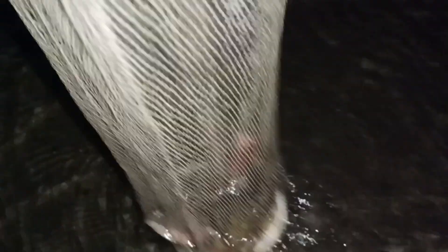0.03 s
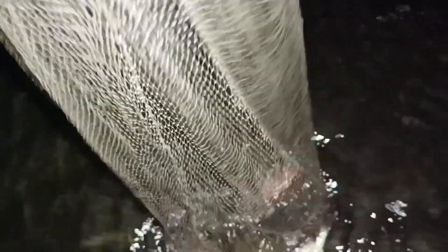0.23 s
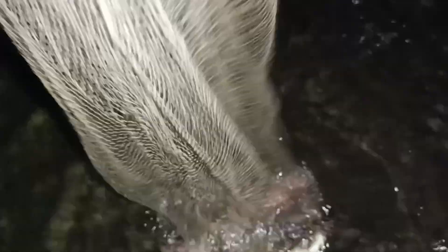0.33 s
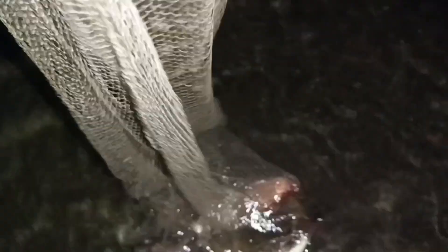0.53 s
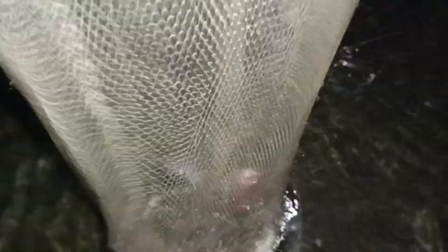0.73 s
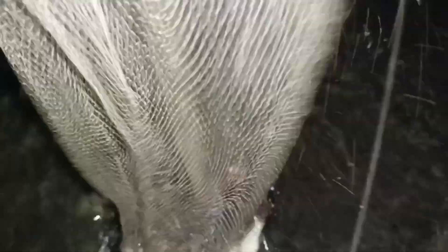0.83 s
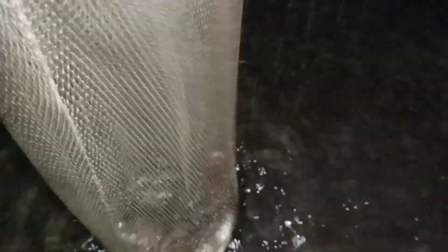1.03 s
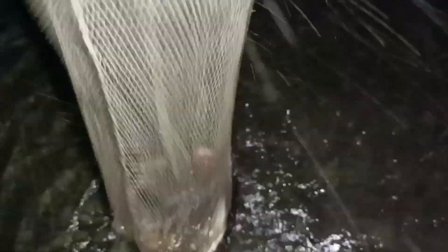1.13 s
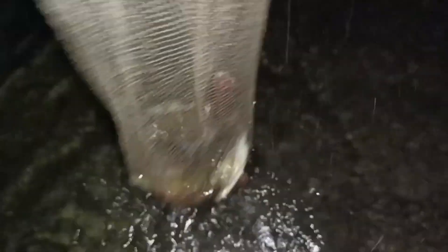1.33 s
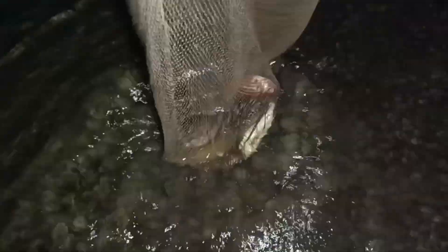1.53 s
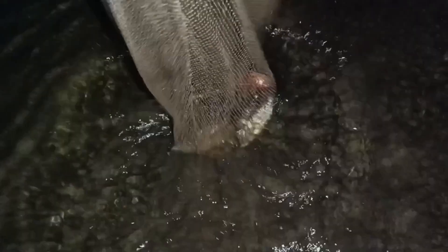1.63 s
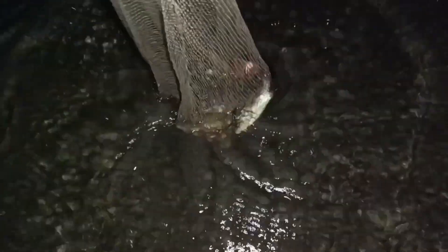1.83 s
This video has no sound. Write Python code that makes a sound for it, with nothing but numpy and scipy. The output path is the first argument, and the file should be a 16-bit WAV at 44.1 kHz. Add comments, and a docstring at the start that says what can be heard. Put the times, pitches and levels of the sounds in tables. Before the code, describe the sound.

A net sweeps through shallow water in one bubbling, splashing surge, then drips as water settles

```python
"""A mesh net is swept through shallow water, close by and a little to the right.
One surge swells and drains: decaying sine bubbles by the hundred over a wash of band-passed noise.
Large bubbles plop, as single rising sines, and drops add a tick of noise to a short ring.
Then the net is lifted; it plops and drips while the churned water, softer bubbles and foam, keeps
lapping and fizzing. A short scatter of decaying noise follows each plop and drip."""
import sys
import numpy as np
from scipy import signal
from scipy.io import wavfile

SR = 44100
rng = np.random.default_rng(int(sys.argv[2]) if len(sys.argv) > 2 else 0)


def unload_wav(signal):
    """Save mono or channel-first audio to the path in sys.argv[1] as 16-bit WAV at rate SR, clipped to [-1, 1]."""
    wavfile.write(
        sys.argv[1],
        SR,
        np.round(np.clip(np.atleast_2d(signal).T, -1, 1) * 32767).astype(np.int16),
    )


N = 83790
TIME = np.arange(N) / SR
LEFT_LAG_S = 0.00028  # sound from the right reaches the left microphone later


def from_db(db):
    """Decibels are logarithmic: an amplitude ratio of ten is 20 dB."""
    return 10 ** (np.asarray(db) / 20)


def rms_one(x):
    """Power is the mean square: scale it to one."""
    return x / np.sqrt(np.mean(x ** 2) + 1e-20)


def in_time(rows):
    """Envelopes by linear interpolation: each column of a curve at every sample."""
    s, *columns = np.transpose(rows)
    return [np.interp(TIME, s, column) for column in columns]


def at_hz(points, hz):
    """A spectrum read on a logarithmic frequency axis, as pitch is heard."""
    f, value = np.transpose(points)
    return np.interp(np.log(hz), np.log(f), value)


def panned(db):
    """Level difference between the ears: left and right gains of constant total power."""
    return rms_one(from_db(np.array([[db], [-db]]) / 2))


def shore(x):
    """Diffuse reflection: a short, bright scatter from the bank and the water, as decaying noise."""
    level_db, t60_s, low_hz = -5, 0.092, 1500  # level ahead of the high-pass
    t = TIME[:SR // 2]
    tail = rng.standard_normal((2, len(t))) * from_db(-60 * t / t60_s)
    tail /= np.sqrt(np.sum(tail ** 2, axis=1, keepdims=True))
    high_pass = signal.butter(2, low_hz, "high", fs=SR, output="sos")
    tail = signal.sosfilt(high_pass, tail)
    return from_db(level_db) * signal.fftconvolve(x, tail, axes=1)[:, :N]


def foam(hz):
    """Many tiny bursts merge into noise: a third of an octave of smooth, partly correlated wash."""
    # likeness of the two channels: (frequency [Hz], left-right correlation [-1 to 1])
    likeness = [(60, 0.81), (250, 0.99), (700, 0.31), (1500, 0.36), (4000, 0), (14000, 0.78)]
    edges_hz = hz * 2 ** (np.array([-1, 1]) / 6)
    band_pass = signal.butter(2, edges_hz, "band", fs=SR, output="sos")
    mid, side = signal.sosfilt(band_pass, rng.standard_normal((2, N)))
    alike = np.clip(at_hz(likeness, hz), -1, 1)
    shared, opposed = np.sqrt(1 + alike) * mid, np.sqrt(1 - alike) * side
    left, right = shared + opposed, shared - opposed
    late_left = np.interp(TIME - LEFT_LAG_S, TIME, left)
    return rms_one(np.array([late_left, right]))


def clumps():
    """Amplitude modulation: a slow random gain gathers the bubbles in bursts."""
    spread_db, clumps_per_s = 2.2, 22
    knots = rng.standard_normal(400)
    # two random knots to each clump
    return from_db(spread_db * np.interp(TIME * 2 * clumps_per_s, np.arange(len(knots)), knots))


def bubble_cloud(hz, cycles, size_db, count):
    """Damped resonance of trapped air: random bubbles near one pitch, each gliding slightly upward."""
    lag_spread_s, pan_spread_db = 0.00025, 3
    start, u = rng.random((2, count, 1))
    size = from_db(size_db * np.minimum(rng.exponential(1, (count, 1)), 4))
    lag, pan = rng.standard_normal((2, count, 1))
    pitch = hz * 2 ** ((u - .5) / 3)
    life = cycles / hz  # time to fall by 60 dB [s]
    steps = np.arange(int(life * SR) + 40)
    where = ((start * N).astype(int) + steps) % N  # a ring past the end wraps to the start
    left_lag = LEFT_LAG_S + lag_spread_s * lag
    out = []
    for side in (1, -1):  # left, right
        t = np.maximum(steps / SR - np.maximum(side * left_lag, 0), 0)
        tone = np.sin(2 * np.pi * pitch * t * (1 + 0.035 * t / life))
        ring = tone * from_db(-60 * t / life) * (1 - np.exp(-2 * pitch * t))
        placed = ring * size * from_db(side * pan_spread_db * pan / 2)
        out.append(np.bincount(where.ravel(), placed.ravel(), N))
    return rms_one(np.array(out))


def water(colour, wash_db, cycles, size_db, count):
    """Pitch is inverse to bubble size, and small bubbles are more numerous: yields (Hz, stereo band)."""
    # balance at the microphones: (frequency [Hz], left minus right [dB])
    balance = [(150, 0.5), (700, 0), (1500, -4), (3000, -5.5), (4300, 2), (6500, -11), (7800, -7),
               (9500, 8.5), (11500, 4), (14500, -8)]
    for hz in 15000 / 2 ** (np.arange(27) / 3):  # thirds of an octave
        # count is the number of bubbles at 1 kHz
        cloud = bubble_cloud(hz, cycles, size_db, count=int(count * (hz / 1000) ** .75))
        high_pass = signal.butter(2, hz / 2, "high", fs=SR, output="sos")
        cloud = rms_one(signal.sosfilt(high_pass, cloud) * clumps())
        mixed = rms_one(cloud + from_db(wash_db) * foam(hz))
        gain = from_db(at_hz(colour, hz)) * np.sqrt(hz)  # bandwidth grows with frequency
        yield hz, gain * panned(at_hz(balance, hz)) * mixed


def ripples():
    """Many weak bubble resonances: stirred water laps low and fizzes softly."""
    # low lapping around the net: (time [s], level [dB])
    lapping = [(0, -91), (0.1, -61), (0.25, -58.5), (0.75, -54.5), (0.9, -64), (0.97, -73), (1.03, -62),
               (1.2, -62.5), (1.32, -61.5), (1.45, -67), (1.58, -63), (1.7, -64), (1.9, -64)]
    # fizz of the unsettled water: (time [s], level [dB])
    fizzing = [(0, -91), (0.04, -60), (0.85, -50), (1.0, -53.5), (1.12, -56), (1.3, -55.5), (1.45, -58.5),
               (1.52, -54.5), (1.65, -57.5), (1.9, -58.5)]
    # spectral density within each part: (frequency [Hz], relative level [dB per Hz])
    ripple_colour = [(35, -23), (75, -4), (150, -4), (240, -10), (400, -5.5), (950, -9.5), (1500, -5.5),
                     (2100, -2.5), (3000, -13), (4700, -32.5), (6000, -30.5), (9000, -28), (12000, -36),
                     (15000, -31.5)]
    # wandering place of the fizzing patch: (time [s], left minus right [dB])
    fizz_pan = [(1.0, -0.5), (1.4, 0), (1.8, -1.5)]
    lap_top_hz = 700
    lap, fizz = np.zeros((2, 2, N))
    for hz, band in water(ripple_colour, wash_db=0, cycles=25, size_db=4.2, count=400):
        if hz > lap_top_hz:
            fizz += band
        else:
            lap += band
    (lap_db,), (fizz_db,), (pan_db,) = in_time(lapping), in_time(fizzing), in_time(fizz_pan)
    place = from_db(np.array([pan_db, -pan_db]) / 2)
    place /= np.sqrt(np.mean(place ** 2, axis=0))
    return from_db(lap_db) * rms_one(lap) + from_db(fizz_db) * place * rms_one(fizz)


def bubble(s, hz, t60, onset_cycles, pan):
    """A pocket of air is a damped oscillator, rising slightly in pitch; the right ear hears it first."""
    rise_per_s = 0.16  # relative to the starting pitch
    lag_s_per_db = 0.00002  # a bubble further right reaches the left microphone later still
    out = np.zeros((2, N))
    alive = (TIME >= s) & (TIME < s + 2 * t60)
    lag = np.array([[LEFT_LAG_S - lag_s_per_db * pan], [0]])
    t = np.maximum(TIME[alive] - s - lag, 0)
    onset = 1 - np.exp(-(hz * t / onset_cycles) ** 2 * 2)
    tone = np.sin(2 * np.pi * hz * t * (1 + rise_per_s * t / 2))
    out[:, alive] = onset * tone * from_db(-60 * t / t60)
    return out


def drips(count=3):
    """Impact and entrainment: a drop spatters, traps a brief bubble and throws off weaker droplets."""
    # drops hitting the surface, and at 1.5778 s the early echo of the one before:
    # (time [s], pitch [Hz], level [dB], t60 [s], left minus right [dB],
    # tick against bubble, ahead of the tick's filter [dB])
    drops = [(0.039, 3360, -40, 0.019, 0, -10), (0.067, 8150, -41, 0.0032, -5, 3.5),
             (0.101, 2860, -32, 0.019, -1, -16), (0.184, 8630, -35, 0.0031, -1, 4.5),
             (0.64, 2940, -26.5, 0.011, -9, -20), (0.774, 3690, -34, 0.013, -17, -15),
             (1.298, 3730, -51, 0.013, -3, -18), (1.374, 9400, -44.5, .004, 2, 1),
             (1.376, 4240, -43.5, 0.0094, -4, -12), (1.4023, 8430, -35.5, 0.0027, -1, -5.5),
             (1.4033, 910, -42, 0.027, 1, -22), (1.4076, 7700, -42, 0.0041, -16, -14),
             (1.4107, 3900, -35, 0.011, -8, -12), (1.411, 1810, -38, 0.017, 0, -14),
             (1.472, 4500, -46, 0.006, 3, -11), (1.498, 1570, -36, 0.026, 3, -22),
             (1.523, 1420, -38.5, 0.014, -10, -17), (1.543, 2815, -40.5, 0.035, -6, -20),
             (1.5758, 2770, -25, 0.0096, -7, -21), (1.5778, 2820, -27.5, 0.0097, -9, -27),
             (1.5851, 3380, -32, 0.0054, 3, -12.5), (1.651, 2040, -41, 0.014, -13, -26),
             (1.6695, 3370, -44, 0.013, -2, -8.5), (1.6702, 12900, -43, .005, 3, -12),
             (1.705, 2020, -42.5, .016, -15, -24), (1.731, 3500, -48.5, .012, -5, -22)]
    onset_cycles, tick_t60_s = 1.9, 0.007
    satellite_db, within_s, octaves = -16, 0.014, 0.29  # droplets: level, latest delay, pitch spread
    bright = signal.butter(1, [7360, 10500], "band", fs=SR, output="sos")  # Hz
    out = 0
    for s, hz, db, t60, pan, tick_db in drops:  # the echo is made in the same way as a drop
        tick_gain = (TIME >= s) * from_db(tick_db - 60 * np.abs(TIME - s) / tick_t60_s)
        tick = rng.standard_normal((2, N)) * tick_gain
        spatter = signal.sosfilt(bright, tick + 1e-18)
        satellites = 0
        for late, high in rng.random((count, 2)):
            satellite_hz = hz * 2 ** (octaves * (2 * high - 1))
            satellites = satellites + bubble(s + within_s * late, satellite_hz, t60, onset_cycles, pan)
        drip = bubble(s, hz, t60, onset_cycles, pan) + from_db(satellite_db) * satellites + spatter
        out = out + from_db(db) * panned(pan) * drip
    return out


def plops():
    """Large air pockets resonate low: single bubbles that stand out of the cloud."""
    # single large bubbles: (time [s], pitch [Hz], level [dB], t60 [s], left minus right [dB])
    bubbles = [(0.041, 930, -32.5, 0.018, -1), (0.164, 517, -31, 0.073, 5), (0.221, 115, -31.5, 0.069, -1),
               (0.297, 162, -32, 0.072, -1), (0.3085, 2360, -22, 0.028, -4), (0.36, 228, -27, 0.18, -2),
               (0.385, 210, -19.5, 0.048, -2), (0.402, 784, -20.5, 0.059, -1), (0.406, 125, -29, 0.063, -2),
               (0.447, 238, -26, 0.19, -3), (0.461, 1550, -17, 0.02, -10), (0.47, 580, -12, 0.016, 2),
               (0.538, 544, -24, 0.092, -2), (0.546, 238, -28, 0.13, 3), (0.643, 541, -27, .05, -3),
               (0.824, 302, -32.5, 0.058, -1), (0.843, 336, -32, 0.061, 1), (0.869, 284, -41, 0.11, 0),
               (0.903, 320, -46, 0.072, -5), (1.01, 181, -53, 0.17, 3), (1.231, 254, -23, 0.031, -6),
               (1.231, 694, -35.5, 0.025, 0), (1.239, 118, -36.5, 0.087, 0), (1.25, 348, -39, 0.042, 6),
               (1.262, 268, -32, 0.036, 0), (1.273, 365, -39, 0.035, 6), (1.3315, 1000, -33, 0.09, 9),
               (1.334, 391, -52, 0.11, 2), (1.543, 412, -44, 0.032, -3), (1.779, 223.7, -51.5, 0.25, 1),
               (1.804, 246, -46.5, 0.1, 1)]
    out = 0
    for s, hz, db, t60, pan in bubbles:
        out = out + from_db(db) * panned(pan) * bubble(s, hz, t60, onset_cycles=1.3, pan=pan)
    return out


def surge():
    """Bubble resonances in bulk as the net ploughs through: gulps, splash and spray swell and drain."""
    # envelopes of four bands, ahead of the fade: (time [s], deep bass level [dB],
    # upper bass level [dB], middle level [dB], treble level [dB])
    swell = [(0.016, -74, -62.5, -64, -68), (0.044, -66.5, -50.5, -49, -58.5),
             (0.15, -55.5, -46.5, -45, -50), (0.245, -49, -44.5, -43, -48.5),
             (0.315, -41.5, -41, -31.5, -44), (0.375, -37.5, -32, -34.5, -44),
             (0.415, -37, -33.5, -28, -39.5), (0.465, -40, -30.5, -28, -37.5), (0.55, -42, -34, -29, -39),
             (0.59, -49, -41.5, -33.5, -43.5), (0.71, -53, -45, -35, -47.5),
             (0.78, -55, -49.5, -43.5, -50.5), (0.84, -57.5, -52.5, -50, -68), (0.94, -76, -64, -57.5, -79),
             (1.1, -87, -69, -63, -85)]
    # spectral density within each band: (frequency [Hz], relative level [dB per Hz])
    surge_colour = [(40, -38), (75, -28), (120, -19), (230, -6.5), (340, -8), (560, -4.5), (850, -5),
                    (1300, -6), (2000, -4.5), (3000, -14), (4800, -28.5), (9500, -33.5), (12000, -43),
                    (15000, -37)]
    # borders between the four bands: (frequency [Hz], three in rising order)
    band_edges = (270, 700, 2700)
    parts = np.zeros((4, 2, N))
    for hz, band in water(surge_colour, wash_db=-2.5, cycles=26.0, size_db=3.8, count=1100):
        parts[np.searchsorted(band_edges, hz)] += band
    drained = np.interp(TIME, [0, .015, .95, 1.15], [0, 1, 1, 0])
    return drained * sum(rms_one(part) * from_db(db) for part, db in zip(parts, in_time(swell)))


def scene():
    """Superposition: surge, ripples and single plops and drips add, the singles with their scatter."""
    singles = plops() + drips()
    return surge() + ripples() + singles + shore(singles)


def record(dry):
    """Band limitation: the microphones shed the deepest bass; the top is cut steeply."""
    high_pass = signal.butter(3, 55, "high", fs=SR, output="sos")
    thin = signal.sosfilt(high_pass, dry)
    # 0.1 dB ripple in the passband, 70 dB rejection above it
    low_pass = signal.ellip(10, .1, 70, 15900, fs=SR, output="sos")
    return signal.sosfilt(low_pass, thin)


dry = scene()
out = record(dry)
unload_wav(out)
```